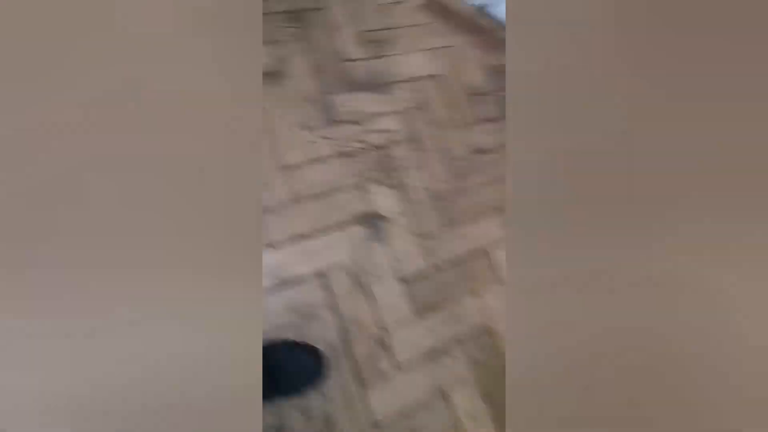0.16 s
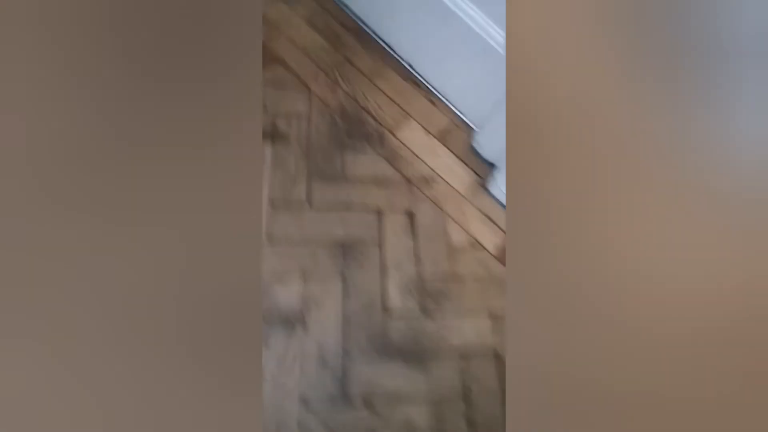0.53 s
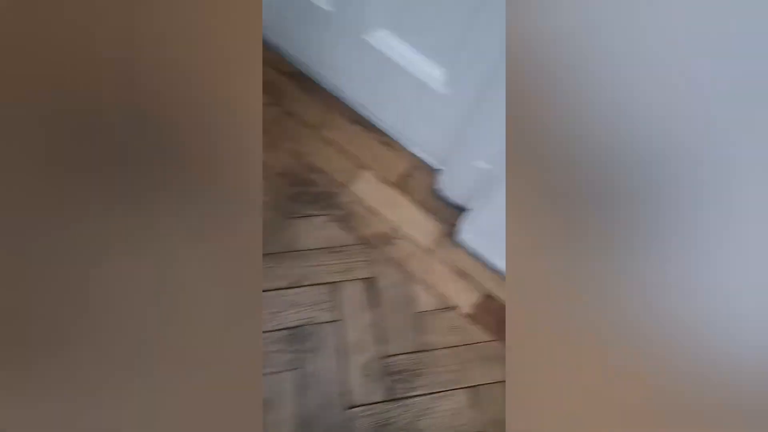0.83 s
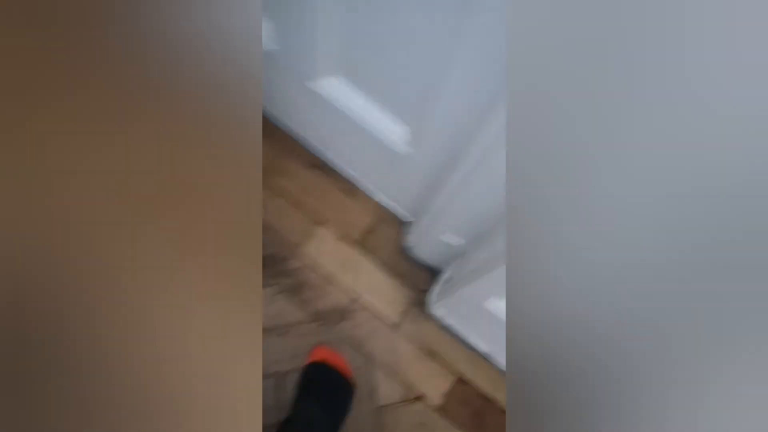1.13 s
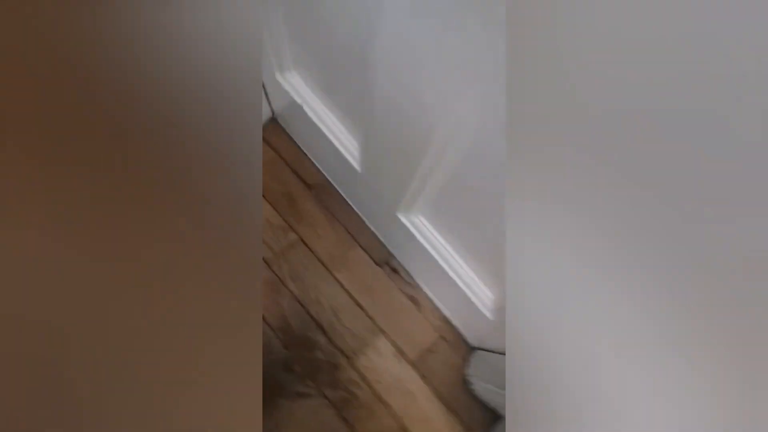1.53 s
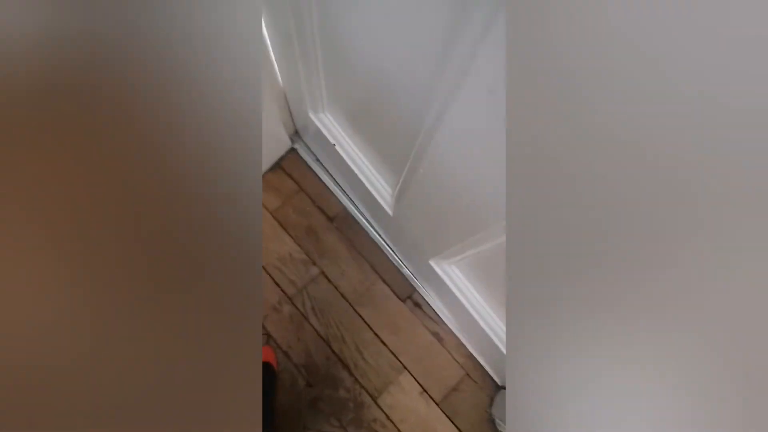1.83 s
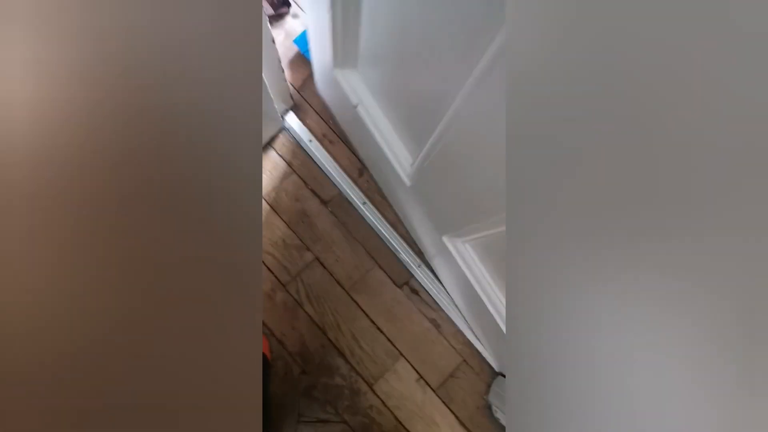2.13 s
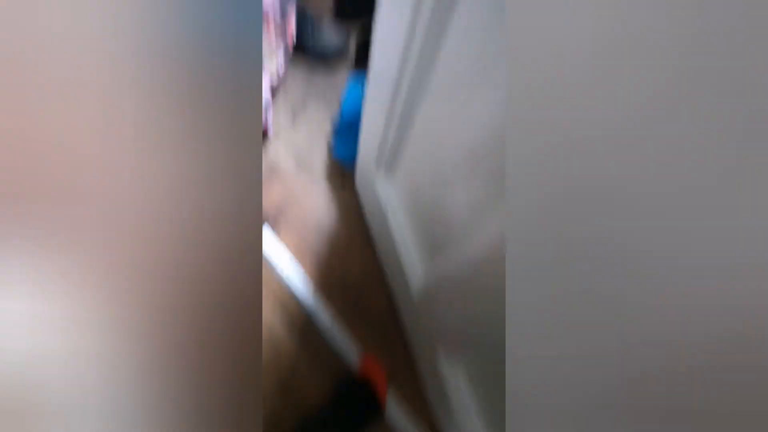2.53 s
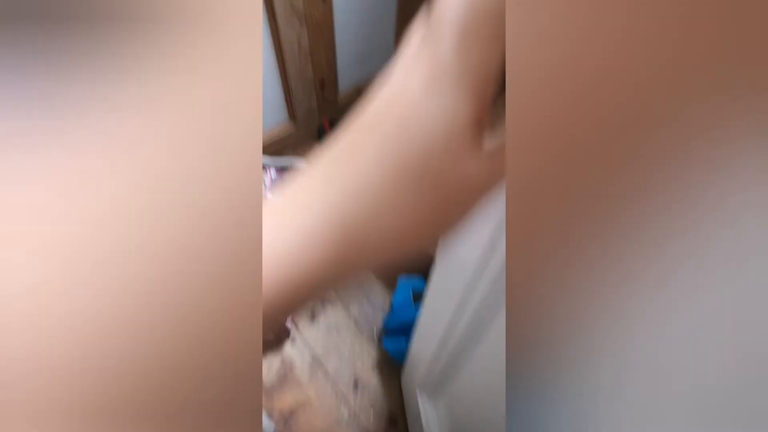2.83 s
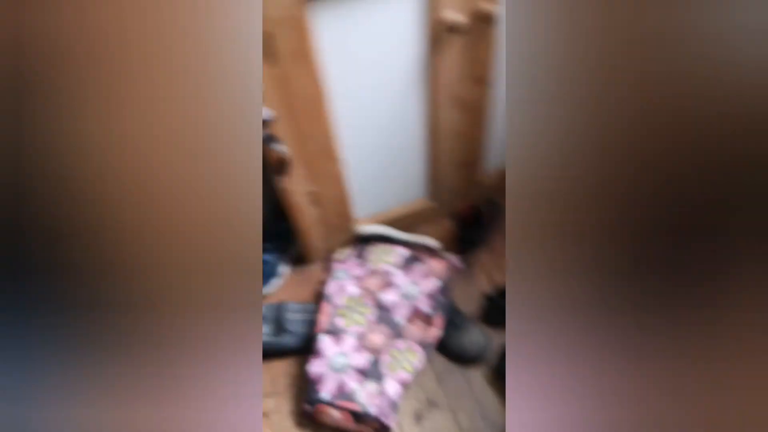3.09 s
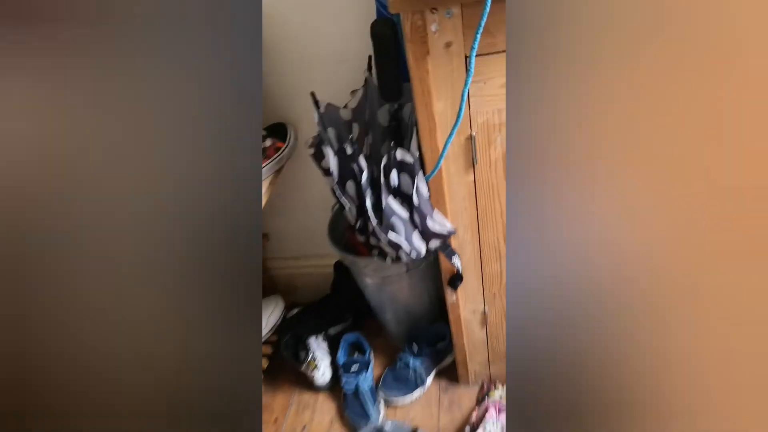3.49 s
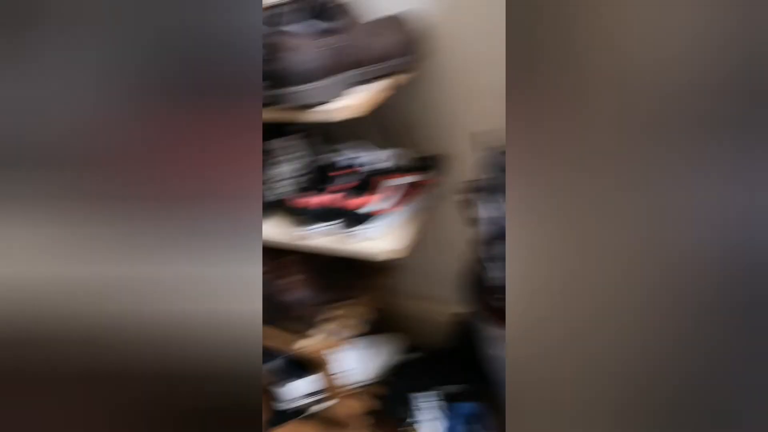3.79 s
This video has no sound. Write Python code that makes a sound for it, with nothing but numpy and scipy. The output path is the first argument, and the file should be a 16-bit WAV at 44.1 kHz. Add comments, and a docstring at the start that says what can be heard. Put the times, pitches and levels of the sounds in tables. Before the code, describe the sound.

Door latch clacks open indoors, with soft sock-footed thumps on a wooden floor and one heavy boom

```python
"""A quiet hallway hums under a breathy sock shuffle; someone in socks walks a wooden floor holding a phone.
They work a door latch, swing the door open and step through. Filtered noise makes the air, cloth and door rubs,
short low waves make the thumps through boards and hand, and a slower swelling tone makes one heavy booming step.
Latch clacks are sets of fading metal tones roughened by rattle; dry ticks are short bursts of noise."""
import sys
import numpy as np
from scipy import signal
from scipy.fft import rfft, irfft
from scipy.io import wavfile
from scipy.ndimage import uniform_filter1d

SR = 44100
rng = np.random.default_rng(int(sys.argv[2]) if len(sys.argv) > 2 else 0)


def int16_out(signal):
    """Quantize to a 16-bit WAV file."""
    q = np.round(np.clip(np.atleast_2d(signal).T, -1, 1) * 32767)
    wavfile.write(sys.argv[1], SR, q.astype(np.int16))


N = 174195
LATCH_LAG = 27.2  # samples between the two sound ports
GRAIN_HZ = 220  # how often friction picks a new random level

# Tones of the metal lever: pitch_hz, level_db (relative), t60_s (time to fade by 60 dB)
LEVER_MODES = [(974, -5, .05), (1260, -6, .045), (2169, 0, .022), (2480, -4, .016), (2830, -7, .02),
               (3774, -7, .008), (4646, -10, .008), (5330, -21, .06)]


def undb(db):
    """Turn decibels into a plain multiplier."""
    return 10 ** (np.asarray(db) / 20)


def unit(x):
    """Scale a signal to an rms level of 1."""
    return x / np.sqrt(np.mean(x ** 2))


def curve(points, at):
    """Read a level between listed frequencies, along a logarithmic pitch scale."""
    p = np.array(points, float)
    return np.interp(np.log(at + 1), np.log(p[:, 0] + 1), p[:, 1])


def ports(x, lag):
    """One wave reaches two ports lag samples apart: half a lag late at one, half early at the other."""
    turn = np.exp(-1j * np.pi * np.arange(N // 2 + 1) / N * lag)
    return irfft(rfft(x) * np.array([turn, 1 / turn]), N)


def diffuse(gain):
    """Noise of a given spectrum arrives from eight directions, with an rms level of 1."""
    # Delay between the two ports for each direction: lag_samples
    port_lags = (-33, 30, -26, 24, -40, 34.5, -6.5, 15)
    hz = np.arange(N // 2 + 1) * SR / N
    noise = sum(ports(rng.standard_normal(N), lag) for lag in port_lags)
    return unit(irfft(rfft(noise) * gain(hz), N))


def peaks(table):
    """Make a spectrum from resonant humps, given as pitch_hz, width_hz, level_db."""
    def gain(f):
        power = 0
        for hz, width_hz, db in table:
            off_pitch = (f * f - hz * hz) / (f * width_hz + 1)
            power = power + undb(2 * db) / (1 + off_pitch ** 2) ** 2
        return np.sqrt(power)
    return gain


def walk(rate):
    """A smoothly wandering random level with an rms of 1, given rate new values per second."""
    k = int(SR / rate)
    steps = np.repeat(rng.standard_normal(N // k + 1), k)
    return unit(uniform_filter1d(uniform_filter1d(steps, k), k)[:N])


def ring(modes):
    """A struck object sounds several fading tones, every second one upside down."""
    t = np.arange(SR // 2) / SR
    out = 0
    for k, (hz, db, t60) in enumerate(modes):
        out = out + (-1) ** k * undb(db - 60 * t / max(t60, .005)) * np.sin(2 * np.pi * hz * t)
    return out


def pan(pan_db):
    """Gains that make the left channel pan_db louder than the right."""
    return undb(np.array([[pan_db], [-pan_db]]) / 2)


def add(out, x, s, pan_db):
    """Mix a short sound in at s seconds."""
    i = int(s * SR)
    x = x[..., :N - i]
    out[:, i:i + x.shape[-1]] += x * pan(pan_db)


def hall():
    """Air and house rumble: the bass heaves with the hand, a low hum wavers, the air breathes."""
    # Colour of the hallway noise: pitch_hz, level_db (relative, per Hz)
    hall_colour = [(13, -16), (25, -1.5), (46, -29.5), (72, -18.5), (121, -14), (142, -25.5), (203, -20),
                   (246, -28.5), (462, -37), (620, -40), (1500, -42.5), (2000, -37.5), (2900, -46),
                   (9000, -51.5), (15500, -59.5)]

    def band(lo, hi):
        return diffuse(lambda f: undb(curve(hall_colour, f)) * (f >= lo) * (f < hi))

    heave_db, breathe_db = 3 * walk(14), 1.6 * walk(3)
    bass = undb(-53 + heave_db) * band(0, 90)
    air = undb(-60 + breathe_db) * band(98, 24000)
    hum = undb(-75.5) * diffuse(peaks([(117.9, 8.1, 0)]))
    return bass + air + hum


def rub(t, rows, colour, pan_db, grain_db):
    """Grainy friction noise of one colour; its three bands follow their own levels."""
    rows, grain, out = np.array(rows), walk(GRAIN_HZ), 0
    for col, (lo, hi) in enumerate(((150, 1500), (1500, 3500), (3500, 20000))):
        flicker_db = grain_db * (grain + walk(GRAIN_HZ / 2))  # part shared by the bands, part their own
        db = np.interp(t, rows[:, 0], rows[:, col + 1], -120, -120) + flicker_db
        out = out + undb(db) * diffuse(lambda f: undb(curve(colour, f)) * (f >= lo) * (f < hi))
    return out * pan(pan_db)


def soft_rubs(t):
    """Soft broad friction noise swells and fades: the scuff's tail, cloth and faint rubs."""
    # Loudness over time: time_s, low_db (under 1500 Hz), middle_db (to 3500 Hz), treble_db
    levels = [(.5, -74, -74, -75), (.6, -61, -62, -66), (.7, -79, -82, -81), (1.1, -89, -79.5, -78),
              (1.18, -73, -68, -63.5), (1.28, -111, -85, -83), (2.888, -70, -79, -78),
              (2.952, -50.5, -59, -66.5), (3.01, -67.5, -69.5, -73), (3.2, -96, -75, -77),
              (3.5, -65.5, -69, -75.5), (3.576, -55, -54, -58.5), (3.65, -72, -67.5, -73)]
    # Colour: pitch_hz, level_db (relative, per Hz)
    colour = [(180, -25), (300, -6.5), (631, -15.5), (892, -9), (1330, -20), (3500, -28), (9000, -32.5),
              (15500, -35.5)]
    return rub(t, levels, colour, pan_db=-2.5, grain_db=-1.0)


def scuff(t):
    """A sole scuffs the floor, making a short burst of friction noise."""
    # Loudness over time: time_s, low_db, middle_db, treble_db (bands as for soft rubs)
    levels = [(0.404, -89, -94, -86), (0.421, -48, -54, -50), (0.433, -45.5, -44, -47.5),
              (0.447, -55.5, -47, -50.5), (.5, -62, -59, -60.5), (.56, -70, -67.5, -82)]
    # Colour: pitch_hz, level_db (relative, per Hz)
    colour = [(350, -25), (600, -13.5), (786, -24), (1240, 2), (1630, -19.5), (2170, -5), (3120, -18),
              (6380, -19), (15500, -36)]
    return rub(t, levels, colour, pan_db=0.0, grain_db=1.0)


def lever_slide(t):
    """The lever slides, its friction noise rising and falling before, between and after the clacks."""
    # Loudness over time: time_s, low_db, middle_db, treble_db (bands as for soft rubs)
    levels = [(1.48, -71, -68, -74), (1.52, -54, -62, -59.5), (1.555, -53.5, -51, -57.5),
              (1.669, -60, -55, -58.5), (1.71, -46.5, -51, -57), (1.82, -55.5, -76, -73),
              (1.88, -53.5, -81, -98), (1.98, -74, -99, -100)]
    # Colour: pitch_hz, level_db (relative, per Hz)
    colour = [(350, -2.5), (529, -10.5), (981, -1.5), (1370, -14), (2200, -15), (4290, -30.5), (5360, -28),
              (9330, -37), (15500, -55)]
    return rub(t, levels, colour, pan_db=0.5, grain_db=1.6)


def door_sweep(t):
    """The door sweeps the floor with a longer rush of friction noise."""
    # Loudness over time: time_s, low_db, middle_db, treble_db (bands as for soft rubs)
    levels = [(2.225, -93, -101, -95), (2.272, -58, -72, -79.5), (2.4, -58, -63, -66.5),
              (2.522, -58.5, -55, -61), (2.66, -54.5, -58.5, -63), (2.78, -64, -63.5, -62.5),
              (2.874, -70, -74, -79)]
    # Colour: pitch_hz, level_db (relative, per Hz)
    colour = [(300, -4.5), (420, -10), (685, -2), (920, -8), (1100, 0.5), (1330, -10), (2170, -6.5),
              (3340, -14.5), (7620, -16.5), (9800, -18), (15500, -46)]
    return rub(t, levels, colour, pan_db=1.0, grain_db=1.5)


def brush(t):
    """Something brushes past: a sudden burst of friction noise."""
    # Loudness over time: time_s, low_db, middle_db, treble_db (bands as for soft rubs)
    levels = [(3.668, -60, -71, -80), (3.69, -56, -51, -56), (3.711, -37, -33.5, -39),
              (3.738, -42, -44.5, -47.5), (3.755, -47, -46, -51.5), (3.777, -56.5, -58.5, -62.5),
              (3.88, -83, -84, -89)]
    # Colour: pitch_hz, level_db (relative, per Hz)
    colour = [(120, -31), (200, -8.5), (827, -8.5), (2560, -12.5), (6960, -22), (15500, -39)]
    return rub(t, levels, colour, pan_db=-0.3, grain_db=2.0)


def squeak(t, rows, width_hz):
    """A narrow band of noise slides in pitch; smoothed noise on a tone makes it breathy."""
    s, hz, db = np.array(rows).T
    k = int(SR / width_hz)
    slow = uniform_filter1d(uniform_filter1d(rng.standard_normal((2, N)), k), k // 2)
    phase = 2 * np.pi * np.cumsum(np.interp(t, s, hz)) / SR
    breath = unit(slow[0] * np.cos(phase) + slow[1] * np.sin(phase))
    y = breath * undb(np.interp(t, s, db, -120, -120))
    return ports(y, 16.2) * undb(np.array([[-4.], [5.]]))  # louder on the right


def breathy_sounds(t):
    """A sock shuffles, a board chirps and something squeaks, each a sliding band of noise."""
    # Sock shuffle: time_s, centre_hz, level_db (before the left and right gains)
    shuffle = [(.155, 2910, -78), (0.174, 3190, -58), (0.261, 2390, -84)]
    # Board chirp: same columns
    chirp = [(2.97, 3550, -73), (3.015, 3430, -71.5), (3.05, 3300, -82)]
    # Thin squeak: same columns
    thin_squeak = [(3.395, 2150, -73), (3.41, 2037, -59.5), (3.49, 1827, -60.5), (3.589, 1950, -52.5),
                   (3.665, 2020, -74)]
    return (squeak(t, shuffle, width_hz=1970) + squeak(t, chirp, width_hz=180)
            + squeak(t, thin_squeak, width_hz=420))


def thumps(t):
    """Feet, door and hand give rounded low pulses; boards ring on; the heavy step swells and holds."""
    # Soft thumps: centre_s, peak_db, pitch_hz, length_ms (from the centre to 19 dB down)
    soft_thumps = [(0.577, -38, 218, 2.14), (0.591, -39, 50.4, 21), (0.665, -32, 44, 15),
                   (0.786, -40, 220, 2.56), (0.877, -40.5, 58, 21), (1.548, -37.5, 43, 109),
                   (1.569, -37, 120.6, 23), (1.745, -36, 252, 9), (1.85, -29.5, 176, 3.7),
                   (1.875, -28.5, 155, 5.4), (1.888, -37.5, 42.7, 124), (1.896, -33.5, 125.4, 27),
                   (1.939, -35.5, 129, 4.4), (2.013, -37, 118, 10), (2.648, -40.5, 156, 9.6),
                   (2.934, -38, 55, 19), (2.936, -37, 183, 13), (2.962, -45.5, 278.5, 22),
                   (2.985, -43, 122, 39), (3.004, -44, 207.3, 60), (3.138, -32.5, 38, 12),
                   (3.172, -32, 127, 5.4), (3.173, -34, 60.5, 22.3), (3.27, -38, 31.3, 24),
                   (3.487, -36.5, 153, 6.6), (3.681, -47, 382, 6.3), (3.687, -40.5, 43.6, 44)]
    # Ringing of the boards: pitch_hz, level_db (relative), t60_s
    board_modes = [(116, -9, .35), (215, -13, .2)]
    soft = 0
    for s, db, hz, ms in soft_thumps:
        envelope = undb(db - 19 * ((t - s) / (ms / 1000)) ** 2)
        soft = soft + envelope * np.cos(2 * np.pi * (hz * (t - s) + rng.random()))
    after = signal.fftconvolve(soft, ring(board_modes))[:N] * 200 / SR

    rise_s, hold_s, fall_s = 0.076, 0.047, 0.034
    u = t - 3.4515  # seconds since the heavy step began
    swell = np.clip(np.minimum(u / rise_s, 1 - (u - rise_s - hold_s) / fall_s), 0, 1)
    tail = (u > rise_s) * undb(-6.5 - 60 * u / 0.89)
    boom_envelope = np.maximum(np.sin(swell * np.pi / 2) ** 2, tail)
    boom = undb(-18.5) * boom_envelope * np.sin(2 * np.pi * 43.8 * u)

    sway = undb(-29) * walk(25) * (soft + boom)  # opposite sign in the two channels
    return ports(soft + after, 18.6) + boom + sway * np.array([[1], [-1]])


def ticks():
    """Small dry bursts of noise, each with a dull body and a bright edge."""
    # Ticks: start_s, level_db (4 dB is taken off), centre_hz, treble_db (4.5 dB is added)
    tick_rows = [(.597, -49.5, 1120, -21), (.783, -56, 1210, -28), (1.731, -39, 2590, -9.5),
                 (1.788, -43.5, 1710, -4), (1.837, -40, 770, -7.5), (2.456, -44.5, 1160, -21),
                 (2.641, -43, 1200, -1), (2.714, -56, 1180, 4), (2.948, -42, 810, -15),
                 (3.677, -35.5, 1890, -20), (3.742, -36, 2520, -3)]
    # Bright edge: pitch_hz, width_hz, level_db (relative)
    bright_edge = [(5100, 5200, 19.5), (8140, 2400, 10.5)]
    out, t = np.zeros((2, N)), np.arange(SR // 10) / SR
    f = np.arange(len(t) // 2 + 1) * SR / len(t)
    for s, db, hz, treble_db in tick_rows:
        burst = rng.standard_normal((2, 2, len(t)))
        body_gain = peaks([(hz, hz * .4, 0), (2400, 2000, -10)])(f)
        body = unit(irfft(rfft(burst[0]) * body_gain, len(t)))
        edge = unit(irfft(rfft(burst[1]) * peaks(bright_edge)(f), len(t)))
        envelope = undb(db - 4.0 - 60 * t / 0.054) * np.minimum(t / 0.001, 1)
        edge_level = undb(treble_db + 4.5 - 60 * t / 0.078)
        add(out, envelope * (body + edge_level * edge), s, 0)
    return out


def grit(t):
    """The lever spring scrapes between clacks: dense uneven tiny contacts ring the lever's tones."""
    # Scrape loudness over time: time_s, level_db
    grit_levels = [(1.535, -63), (1.56, -63), (1.65, -39.5), (1.685, -66)]
    contacts = rng.random(N) < 1500 / SR  # about 1500 a second
    hits = contacts * undb(2.5 * rng.exponential(size=N)) * rng.standard_normal(N)
    y = unit(signal.fftconvolve(hits, ring(LEVER_MODES))[:N])
    return ports(y * undb(np.interp(t, *np.array(grit_levels).T, -120, -120)), LATCH_LAG)


def latch():
    """Each clack swells into the tones of lever or bolt, roughened by a short rattle of contacts."""
    # Lever clacks: start_s, peak_db (before panning), left_over_right_db, swell_ms (sets how slowly it builds)
    lever_clacks = [(1.522, -32.5, 10, 0.65), (1.535, -18.5, 7, 1.6), (1.638, -32.5, 9, 3.1)]
    # Bolt clacks: same columns
    bolt_clacks = [(1.684, -21.5, 11.8, 2.48), (1.733, -32, 1.8, 2.37)]
    # Tones of the bolt: pitch_hz, level_db (relative), t60_s
    bolt_modes = [(850, -11, .1), (895, -10, .06), (1830, -3, .018), (1910, 0, .022), (2724, -4, .014),
                  (3500, -10, .01), (4300, -13, .01)]
    out, t_ms = np.zeros((2, N)), np.arange(SR // 2) * 1000 / SR

    def top(y):  # scale the peak to 1
        return y / abs(y).max()

    for rows, modes in ((lever_clacks, LEVER_MODES), (bolt_clacks, bolt_modes)):
        tones = ring(modes)
        for s, db, pan_db, ms in rows:
            rattle = rng.standard_normal(len(t_ms)) * (t_ms / ms) ** 2 * np.exp(-2 * t_ms / ms)
            rough = signal.fftconvolve(tones, rattle)[:len(t_ms)]
            late = int(2 * ms * SR / 1000)
            after = np.roll(tones, late) * (t_ms >= 2 * ms)
            # The swell is the ring played backwards and turned upside down
            before = np.roll(tones[::-1], late) * (t_ms < 2 * ms) * -(t_ms / ms / 2) ** 2
            clack = top(after + before) + undb(4) * top(rough)
            add(out, undb(db) * top(clack), s, pan_db)
    return np.array([ports(out[0], LATCH_LAG)[0], ports(out[1], LATCH_LAG)[1]])


def room(hits):
    """The room answers with fading, dulled noise that starts after 4 ms."""
    k = np.arange(SR // 2) / SR
    echo = rng.standard_normal((2, len(k))) * undb(-60 * k / .3) * (k > .004)
    echo = signal.lfilter([.5], [1, -.55], echo)
    echo = echo / np.sqrt(np.sum(echo ** 2) / 2)
    return undb(-12) * signal.fftconvolve(hits, echo, axes=1)[:, :N]


def scene():
    """Mix all the layers; only the latch clacks and ticks get a room echo."""
    t = np.arange(N) / SR
    rubs = soft_rubs(t) + scuff(t) + lever_slide(t) + door_sweep(t) + brush(t)
    hits = ticks() + latch()
    return hall() + rubs + breathy_sounds(t) + thumps(t) + grit(t) + hits + room(hits)


def record(dry):
    """The phone drops the deepest bass and sharply cuts the top."""
    dry = signal.sosfilt(signal.butter(2, 16, "high", fs=SR, output="sos"), dry)
    return signal.sosfilt(signal.ellip(10, .2, 80, 15550, fs=SR, output="sos"), dry)


dry = scene()
out = record(dry)
int16_out(out)
```